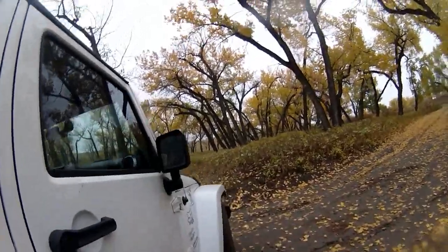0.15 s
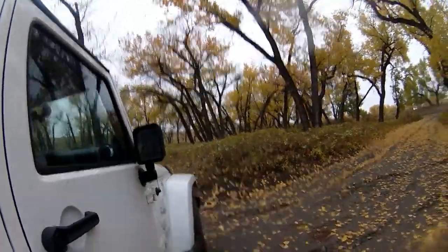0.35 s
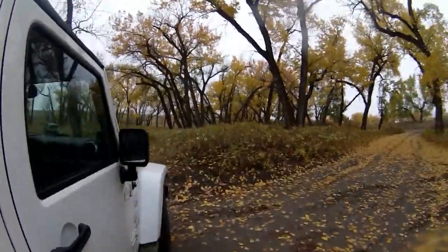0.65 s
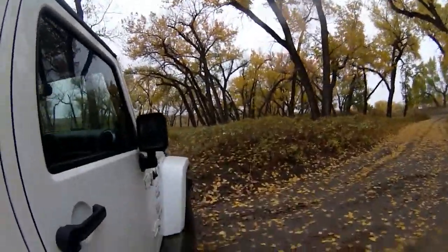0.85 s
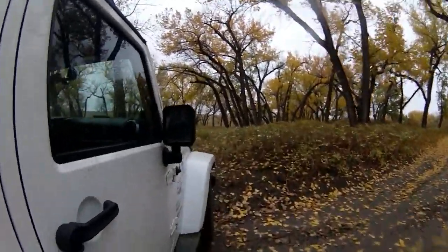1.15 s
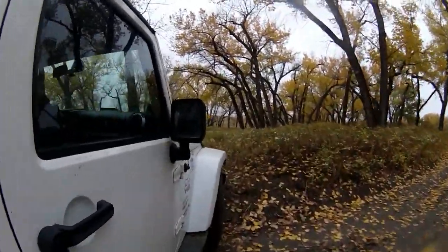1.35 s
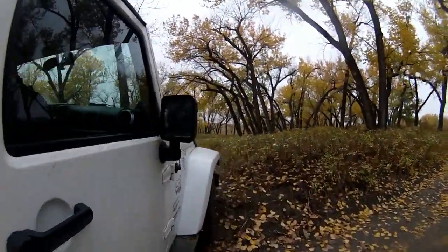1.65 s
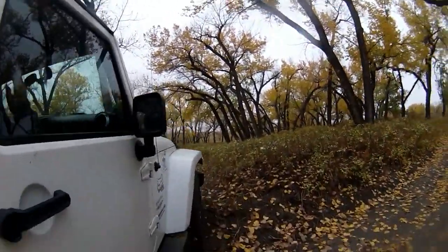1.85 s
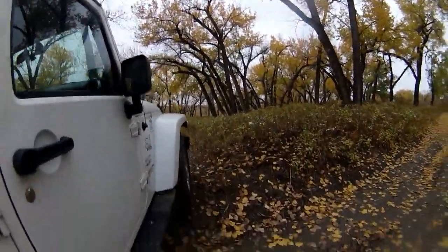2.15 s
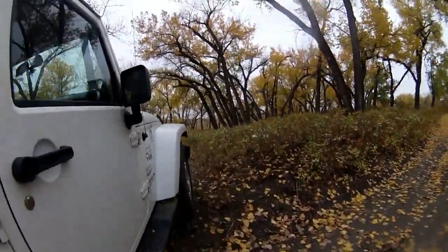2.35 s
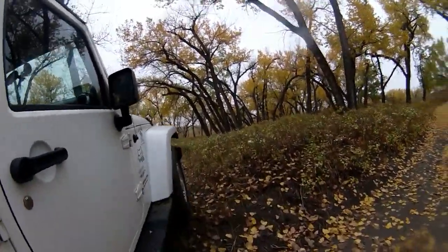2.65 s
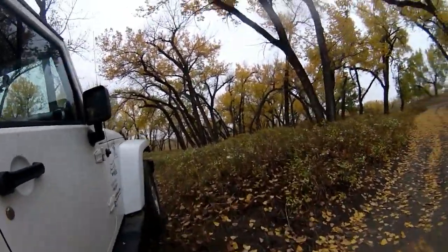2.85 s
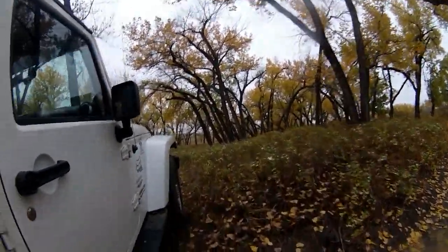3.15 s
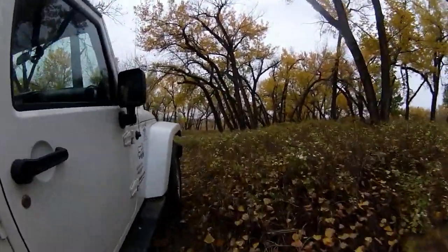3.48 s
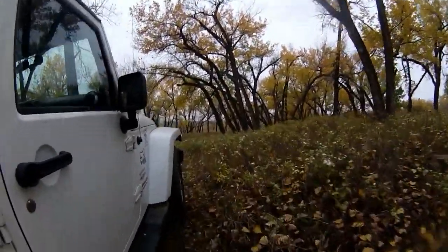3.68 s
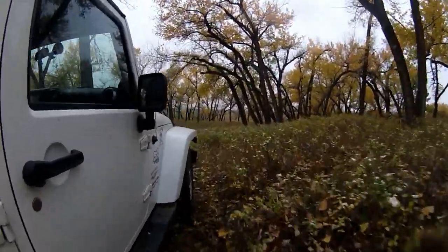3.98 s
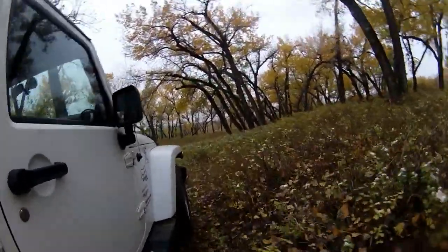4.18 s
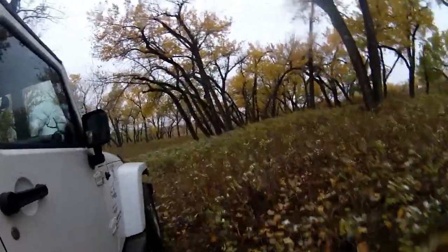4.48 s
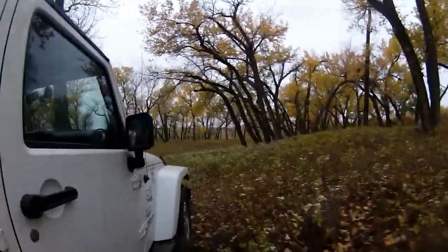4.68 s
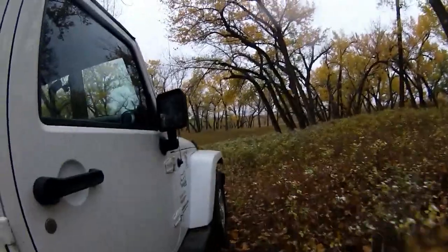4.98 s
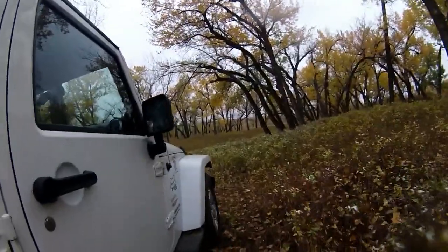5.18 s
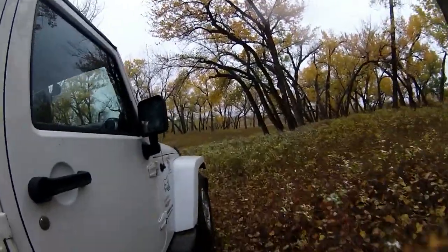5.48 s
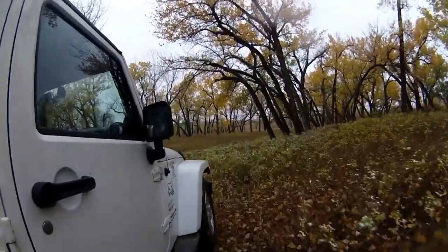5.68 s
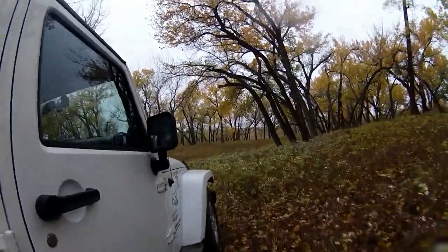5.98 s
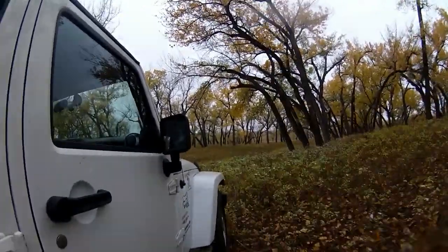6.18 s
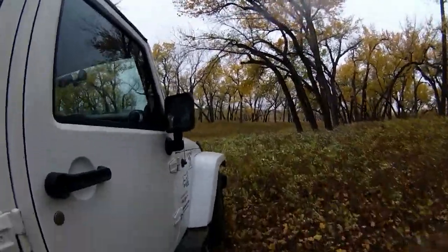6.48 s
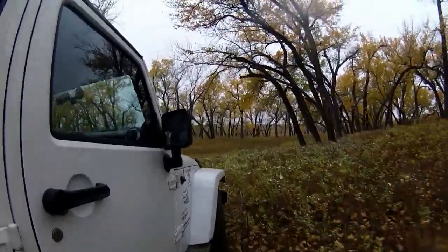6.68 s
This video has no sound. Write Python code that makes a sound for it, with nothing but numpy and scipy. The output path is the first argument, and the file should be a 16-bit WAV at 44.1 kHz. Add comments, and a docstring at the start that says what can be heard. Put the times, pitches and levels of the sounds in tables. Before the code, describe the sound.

A four-wheel-drive engine idles, revs up and eases off twice, while tyres crunch over dry leaves and twigs.

```python
"""Four-wheel-drive on a leafy dirt track

Heard from just outside the door, a six-cylinder engine crawls at idle, revs twice and falls back. Its firings
pulse down the exhaust, rasp in the intake and shake a loose panel; thin whines slide by. Tyres crunch over dry
leaves, stones and twigs, and a second engine drones further off. The microphone colours the treble, and a thin
high buzz rides on the bass."""
import sys
import numpy as np
from scipy.fft import rfft, irfft, next_fast_len
from scipy.io import wavfile
from scipy.ndimage import map_coordinates

SR = 44100
rng = np.random.default_rng(int(sys.argv[2]) if len(sys.argv) > 2 else 0)


def put_to_file(sound):
    """Save the sound as 16-bit audio at rate SR, in the file named by the first command-line argument."""
    columns = np.atleast_2d(sound).T  # one column per channel
    safe = np.clip(columns, -1, 1)
    whole_steps = np.round(safe * 32767)
    wavfile.write(sys.argv[1], SR, whole_steps.astype(np.int16))


N = 301203

# the near engine's speed: t/s, firing rate/Hz
FIRING_RATE = [(0, 33.8), (.6, 34.8), (1.56, 33.9), (1.7, 43), (1.81, 55.5), (1.95, 74.5), (2.04, 79.8),
               (2.21, 72.2), (2.35, 82), (2.47, 84), (2.7, 92.8), (2.81, 77), (3.04, 56), (3.17, 41),
               (3.54, 33.8), (3.92, 64.6), (4.12, 85.5), (4.25, 90), (4.33, 79.5), (4.77, 39.5),
               (5.5, 40.6), (6.83, 33)]
# accelerator presses: down/s, up/s, extra pipe bark/dB, extra engine bay hiss/dB
PEDAL_PRESSES = [(1.54, 2.62, 9.5, 4), (3.44, 4.163, 6, 0.5)]
# throaty midrange of engine rasp and dull thuds: f/Hz, level/dB
RASP_SPECTRUM = [(200, -59), (340, 6), (470, 10.5), (555, 4.5), (640, 5), (900, -4.5), (1300, -4),
                 (2000, -9.5), (5000, -26)]
# crisp top of dry leaves and grit: f/Hz, level/dB
LEAF_SPECTRUM = [(400, -3), (1500, -4), (4500, 6.5), (7500, -1.5), (10000, -16.5), (15000, -16.5)]


def engine(pipe_lag=0.457, waver_db=1.7, top_order=13, jitter_cycles=.005, idle_lumpiness=0.28):
    """Each firing sends a pulse down the exhaust and a puff of noise through the intake."""
    # resonances of the muffler and of the pipe: f/Hz, gain/dB
    muffler = [(30, -21.5), (50, -3.5), (72, -9), (90, -3), (115, 4), (150, 1), (185, -5.5), (220, 3),
               (248, -4), (272, 4), (300, 1), (335, -12.5), (370, -17)]
    pipe = [(130, -27), (205, -2), (240, -10.5), (295, -5.5), (340, -31), (388, -20), (420, -41),
            (480, -49), (1000, -103)]
    # colours of the body's rumble and of the engine bay's hiss: f/Hz, level/dB
    rumble_spectrum = [(15, -28), (35, -9), (60, 1), (120, 8.5), (160, 0.5), (220, -5), (290, -9.5),
                       (340, -18.5), (700, -44.5)]
    bay_spectrum = [(300, -17.5), (900, -1), (1600, -8), (2500, 6), (3400, 2), (5000, -10), (9000, -12),
                    (15000, -13)]
    rate, = curves(FIRING_RATE)
    presses = throttle()
    low_db, bark_db, rasp_db, bay_db = engine_levels(rate, presses)
    firings = np.cumsum(rate) / SR + jitter_cycles * wobble(30)
    unevenness = 1 + idle_lumpiness * (1 - presses.sum(0))  # lumpier with the throttle shut
    punch = firing_strengths(firings) ** unevenness
    phase = 2 * np.pi * firings
    pulses = np.zeros(N)
    for order in range(1, top_order + 1):
        hz = order * rate
        # orders swell as they sweep through the resonances
        if order <= len(low_db):
            gain = amp(low_db[order - 1] + along(muffler, hz) + waver_db * wobble(17))
        else:
            gain = amp(bark_db + along(pipe, hz))
        # the pipe delays higher orders more, so each pulse swings up before it plunges
        pulses -= np.sqrt(2) * gain * np.cos(order * phase - pipe_lag * (order - 1) ** 1.5)
    puffs = unit(punch * amp(0.57 * np.cos(phase)))
    rasp = amp(rasp_db) * puffs * noise(RASP_SPECTRUM)
    throb = unit(amp(0.66 * np.cos(phase)))
    hiss = amp(bay_db + 1.35 * wobble(24.82)) * throb * noise(bay_spectrum)
    # the body shudders more as the engine pulls harder
    rumble = amp(-27 + 0.14 * bark_db + 1.6 * wobble(11)) * noise(rumble_spectrum)
    growl = amp(bark_db - 16.5) * puffs * noise(pipe)  # turbulence in the pipe
    return punch * pulses + growl + rasp + hiss + rumble


def throttle(open_s=0.33, close_s=0.54):
    """How far each press holds the throttle open, 0-1: one row per press."""
    t = np.arange(N) / SR
    presses = []
    for down, up, _, _ in PEDAL_PRESSES:
        attack = np.sin(np.pi / 2 * np.clip((t - down) / open_s, 0, 1))
        release = np.clip(1 - (t - up) / close_s, 0, 1)
        presses.append(attack * release)
    return np.array(presses)


def engine_levels(rate, presses, idle_hz=34, fade_db_per_s=1.86, bay_lag_s=0.1):
    """Speed and throttle ride the dB levels of the low orders, pipe bark, intake rasp and bay hiss."""
    # how hard the idling engine pulls over the uneven track: t/s, level/dB
    crawl = [(0, -6.5), (.5, -1), (1.4, -0.5), (2.75, 0.5), (3.1, -11), (3.3, -7.5), (3.5, -3), (4.7, -13),
             (5.05, -7), (5.5, -2), (5.7, -8), (6, 0.5), (6.3, -9.5), (6.83, -4.5)]
    # the first four exhaust orders, ahead of the muffler: idle level/dB, full-throttle level/dB
    low_orders = [(-27.5, -14.5), (-34, -19), (-33, -24), (-34.5, -32)]
    t = np.arange(N) / SR
    crawl_db, = curves(crawl)
    opened = presses.sum(0)
    shut = 1 - opened
    octaves = np.log2(rate / idle_hz)
    extra_bark_db, extra_bay_db = np.transpose(PEDAL_PRESSES)[2:] @ presses
    low_db = [shut * (idle_db + crawl_db) + opened * full_db for idle_db, full_db in low_orders]
    low_db[0] -= 17 * np.exp(-((t - 2.14) / .055) ** 2)  # the boom drops out briefly
    low_db[3] += 0.61 * extra_bark_db  # the fourth order shares the bark
    # bark and rasp grow with speed and slowly fade
    bark_db = -38.5 + 17 * octaves + extra_bark_db + shut * crawl_db - fade_db_per_s * t
    rasp_db = -46 + 7 * octaves + .5 * shut * crawl_db - fade_db_per_s * t
    # the hiss trails the revs and levels off 1.45 octaves above idle
    bay_rise = np.minimum(np.interp(t - bay_lag_s, t, octaves) / 1.45, 1)
    bay_db = -50 + 10.5 * bay_rise ** 2 + extra_bay_db
    return low_db, bark_db, rasp_db, bay_db


def firing_strengths(firings, scatter_db=0.3):
    """The weight of each firing: six unequal cylinders in two banks, and chance."""
    cylinder_db = [-1, .7, -.3, 1, -.9, .5]
    firing_db = np.resize(cylinder_db, 1024) + scatter_db * rng.standard_normal(1024)
    return unit(amp(map_coordinates(firing_db, [firings], order=3, mode="wrap")))


def distant_engine(rasp_db=-31):
    """An exhaust further off: mostly the hum at its firing rate carries."""
    # its revs and swells: t/s, firing rate/Hz, level/dB
    revs = [(0, 78, -39.5), (.1, 66, -34), (.25, 62.6, -46), (3.9, 76, -47), (4.2, 72.4, -22.5),
            (4.33, 86, -23.5), (4.47, 89, -16.5), (4.65, 91, -20), (4.8, 99.7, -20), (5.05, 104, -19.5),
            (5.27, 95, -27), (5.4, 83, -48), (5.75, 62, -42.5), (6.13, 59.5, -32), (6.3, 74, -25.5),
            (6.42, 83.5, -21.5), (6.55, 66, -33), (6.83, 79, -42)]
    # its exhaust orders: multiple of the firing rate, relative level/dB
    orders = [(.5, -25.5), (1, 0.5), (1.5, -15), (2, -18.5), (3, -27.5), (4, -35.5)]
    rate, level_db = curves(revs)
    phase = 2 * np.pi * np.cumsum(rate) / SR + 0.036 * wobble(18)
    drone = np.sqrt(2) * sum(amp(db) * np.cos(order * phase) for order, db in orders)
    return amp(level_db + 1.23 * wobble(7.4)) * (drone + amp(rasp_db) * noise(RASP_SPECTRUM))


def leaves(grains_per_s=500, spread_db=5):
    """Dry leaves crackle in clumps under the tread."""
    # the rustle under the tyres: t/s, relative level/dB
    rustle_envelope = [(0, -54.5), (.45, -49), (1.3, -50.5), (1.75, -48.5), (2.45, -45), (3, -52.5),
                       (3.6, -54.5), (3.9, -58.5), (4.25, -48.5), (4.75, -56), (5.5, -54), (6.1, -56.5),
                       (6.35, -52), (6.83, -54.5)]
    level_db, = curves(rustle_envelope)
    grains = (rng.random(N) < grains_per_s / SR) * rng.standard_normal(N)
    grains *= amp(spread_db * np.minimum(rng.exponential(size=N), 3))  # a few stand out
    rustle = unit(noise(LEAF_SPECTRUM) + .5 * coloured(grains, LEAF_SPECTRUM))
    return amp(level_db + 6 + 1.67 * wobble(30)) * rustle


def crunches(attack_s=.001):
    """A stone or twig gives way under a tyre: a short gritty burst over a dull thud."""
    # each snap: t/s, relative level/dB, thud send/dB, t60/s
    snaps = [(0.041, -27.5, -30.5, 0.064), (.21, -22.5, -21, 0.02), (0.326, -28, -25, 0.061),
             (.41, -28, -35, 0.27), (0.604, -29.5, -0.5, 0.16), (0.643, -26.5, -20, 0.12),
             (0.697, -29.5, -17, 0.14), (.722, -29, -15, 0.13), (.795, -25, -18, 0.14),
             (1.084, -28.5, -10.5, 0.36), (1.099, -30, -1.5, 0.19), (1.428, -35.5, 2, 0.09),
             (2.406, -29, -15, 0.23), (3.633, -38.5, 5.5, 0.55), (3.656, -42.5, 2, 0.31),
             (4.809, -27.5, -15, 0.093), (5.624, -32, -25, .07), (5.779, -27, -33, 0.049),
             (5.994, -30, -25, 0.049), (6.174, -28, -25, .04), (6.293, -27.5, -30, .07),
             (6.345, -31, -28, 0.072), (6.458, -25.5, -24, 0.056), (6.517, -36.5, -6.5, 0.31)]
    grit, thud = np.zeros(N), np.zeros(N)
    for start, db, thud_db, t60 in snaps:
        age = np.maximum(np.arange(N) / SR - start, 0)
        burst = (1 - np.exp(-age / attack_s)) * amp(db - 60 * age / t60)
        grit += burst
        thud += burst * amp(thud_db)
    splinters = unit(amp(1.4 * wobble(500)))  # it breaks in many tiny steps
    return amp(-7.5) * grit * splinters * noise(LEAF_SPECTRUM) + amp(-4) * thud * noise(RASP_SPECTRUM)


def whines(waver=0.0055):
    """Thin tones from the drivetrain and intake swell, slide and fade, never quite steady."""
    # each tone: t/s, length/s, start f/Hz, end f/Hz, level/dB
    glides = [(1.002, 0.5, 138, 202.8, -34.5), (1.983, 0.17, 418, 394, -31), (1.938, 0.18, 775, 890, -43),
              (2.315, 0.29, 494, 515, -36), (2.5, 0.14, 560, 650, -41), (2.527, 0.11, 800, 860, -49),
              (2.63, 0.108, 2300, 2620, -51), (2.749, 0.15, 2230, 2500, -44.5),
              (4.32, 0.17, 2260, 2560, -49.5), (5.362, 0.28, 290, 280, -43),
              (6.342, 0.22, 149.1, 159.3, -31.5), (6.47, 0.091, 2555, 2520, -50)]
    tones, t = np.zeros(N), np.arange(N) / SR
    for start, length, from_hz, to_hz, db in glides:
        progress = np.clip((t - start) / length, 0, 1)
        hz = (from_hz + (to_hz - from_hz) * progress) * (1 + waver * wobble(82))
        swell = amp(db) * np.sin(np.pi * progress)
        tones += swell * np.sqrt(2) * np.sin(2 * np.pi * np.cumsum(hz) / SR)
    return tones


def loose_panel(chatter_db=5):
    """Under load the engine shakes a loose panel, which chatters once per firing."""
    # each rattle: t/s, length/s, level/dB
    rattles = [(2.264, .17, -43), (2.502, 0.19, -36), (3.926, 0.027, -46), (4.0, 0.044, -46),
               (4.06, 0.1, -42)]
    # the panel's ring: f/Hz, level/dB
    panel_spectrum = [(450, -15), (640, 1), (790, 8.5), (950, -1.5), (1250, -4.5), (2000, -66)]
    rate, = curves(FIRING_RATE)
    t = np.arange(N) / SR
    swell = sum(amp(db) * np.sin(np.pi * np.clip((t - start) / length, 0, 1))
                for start, length, db in rattles)
    chatter = unit(amp(chatter_db * np.cos(2 * np.pi * np.cumsum(rate) / SR)))
    return swell * chatter * noise(panel_spectrum)


def amp(db):
    """Decibels to gain."""
    return 10 ** (np.asarray(db) / 20)


def unit(x):
    """Scale to rms 1."""
    return x / np.sqrt(np.mean(x ** 2) + 1e-20)


def along(points, hz):
    """Read (f/Hz, value) points on a log frequency axis."""
    freqs, values = np.transpose(points)
    return np.interp(np.log(hz + 1), np.log(freqs + 1), values)


def curves(rows):
    """One automation curve for each column after the time."""
    times, *columns = np.transpose(rows)
    return [np.interp(np.arange(N) / SR, times, column) for column in columns]


def wobble(rate):
    """A smooth random curve, rate knots a second."""
    return map_coordinates(rng.standard_normal(2000), [np.arange(N) * rate / SR], mode="wrap")


def filtered(x, response):
    """Filter x with a gain that is a function of frequency."""
    size = next_fast_len(N + 8192)
    return irfft(rfft(x, size) * response(np.fft.rfftfreq(size, 1 / SR)), size)[..., :N]


def equalised(x, spectrum):
    """x through an EQ curve of (f/Hz, gain/dB) points."""
    return filtered(x, lambda hz: amp(along(spectrum, hz)))


def coloured(x, spectrum):
    """x equalised and scaled to rms 1."""
    return unit(equalised(x, spectrum))


def noise(spectrum):
    """Coloured noise of rms 1."""
    return coloured(rng.standard_normal(N), spectrum)


def scene():
    """Engines and tyres in one mix, the same in both channels."""
    mix = engine() + loose_panel() + distant_engine() + whines() + leaves() + crunches()
    return np.array([mix, mix])


def record(dry, carrier_hz=12000, top_hz=15300):
    """The microphone's housing colours the treble; the bass is mirrored faintly around a high carrier."""
    # peaks and notches of the housing: f/Hz, gain/dB
    housing = [(2500, -0.5), (3300, -11.5), (4500, -7), (5300, -7), (6030, -20.5), (6600, -7), (7500, -3),
               (8600, -8), (9500, 4.5), (10500, -8), (11300, -7.5), (13300, -9), (14500, 1.5), (15300, -5)]
    # how much bass feeds the high buzz: f/Hz, gain/dB
    buzz_send = [(40, -51), (100, -41.5), (270, -33), (480, -29), (1000, -80), (2000, -100)]
    buzz = 2 * equalised(dry, buzz_send) * np.cos(2 * np.pi * carrier_hz * np.arange(N) / SR)
    return filtered(equalised(dry, housing) + buzz, lambda hz: hz < top_hz)


dry = scene()
out = record(dry)
put_to_file(out)
```